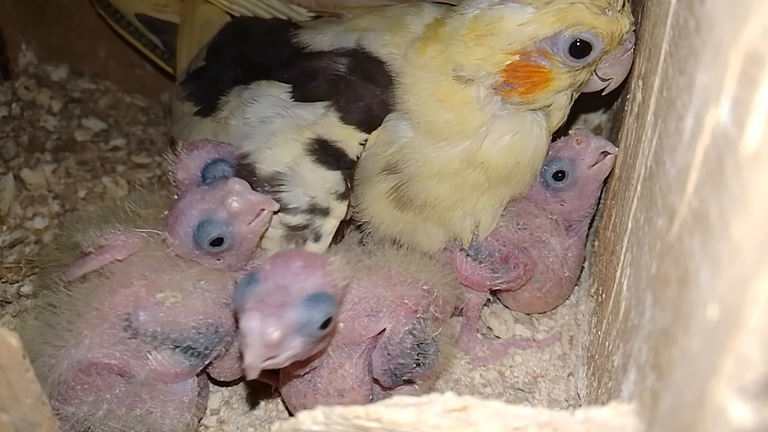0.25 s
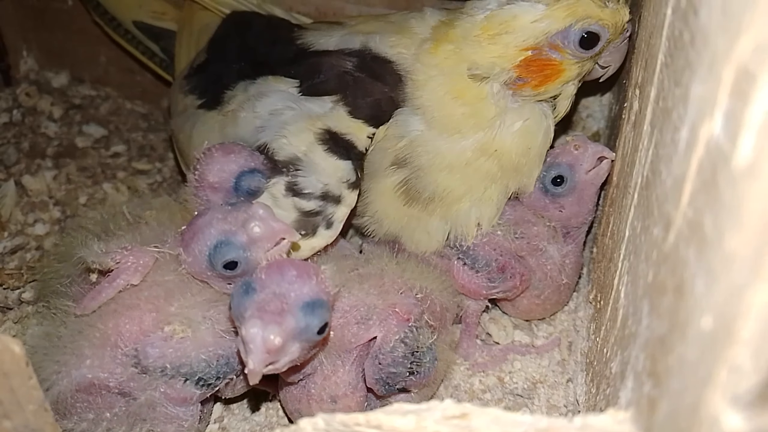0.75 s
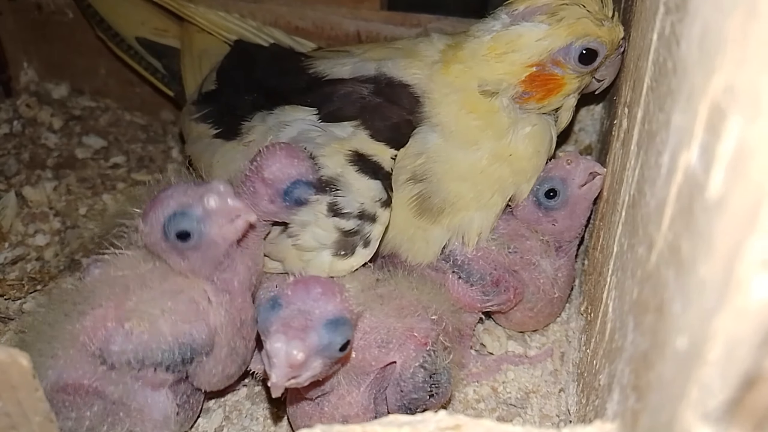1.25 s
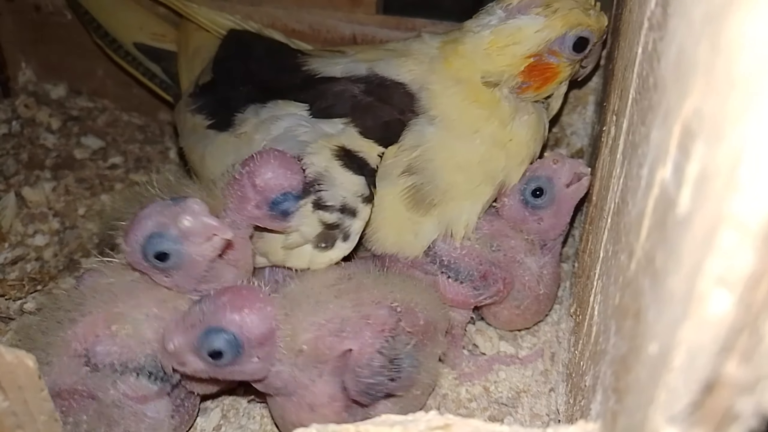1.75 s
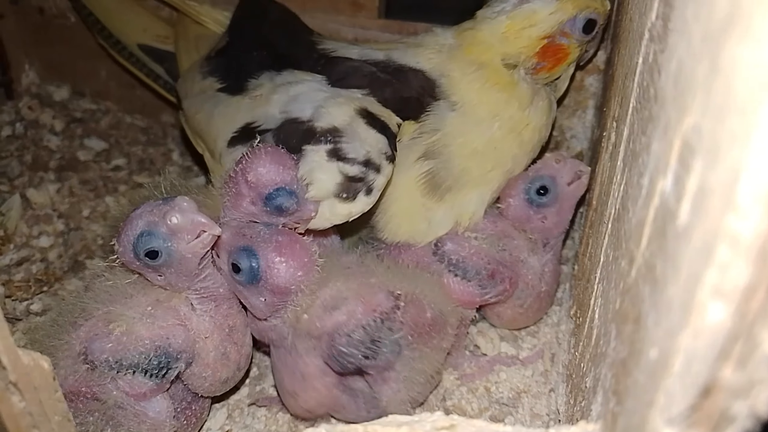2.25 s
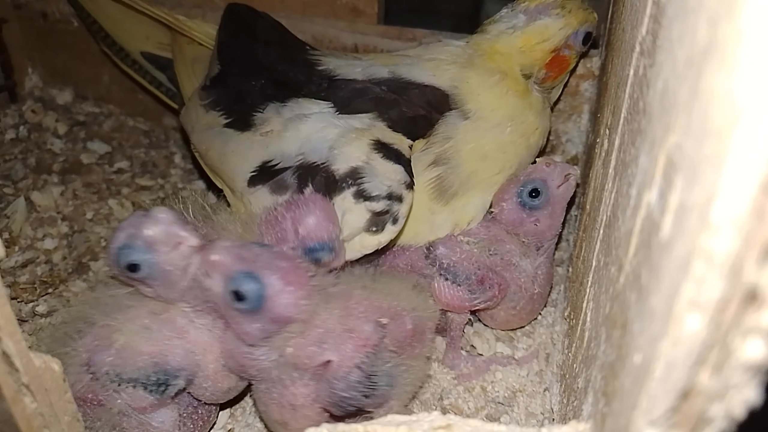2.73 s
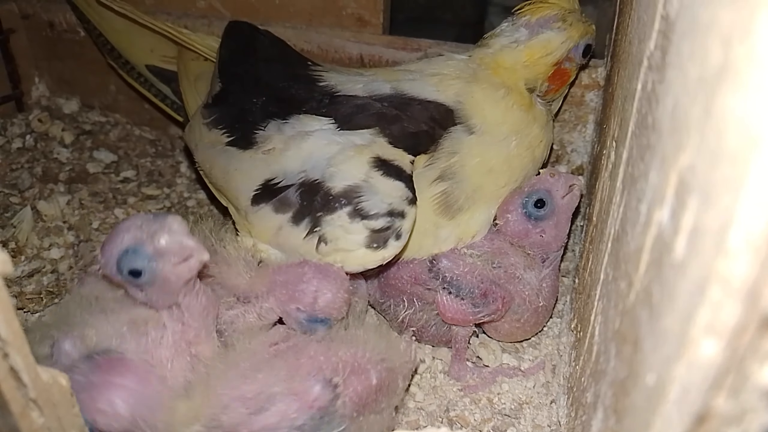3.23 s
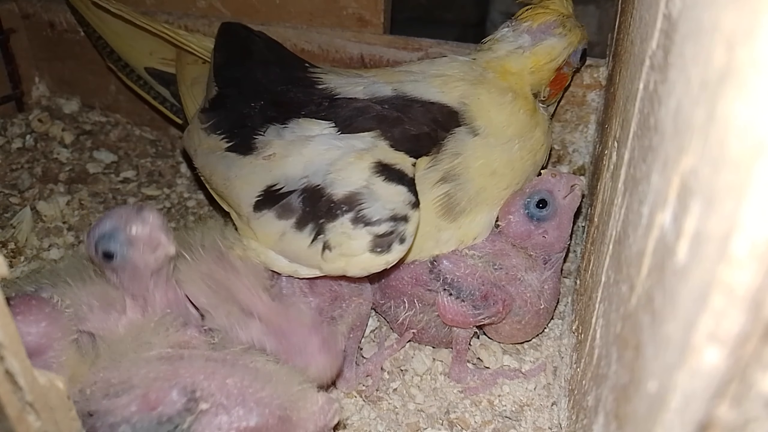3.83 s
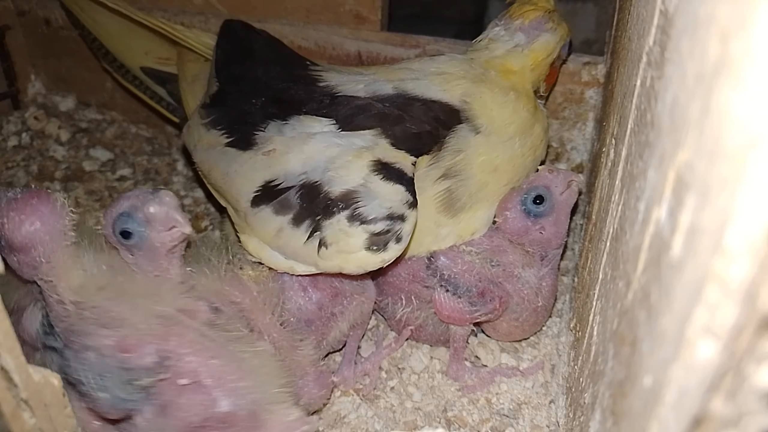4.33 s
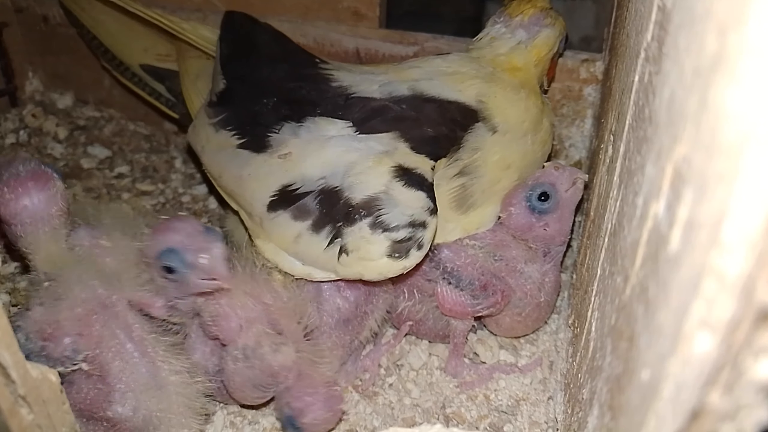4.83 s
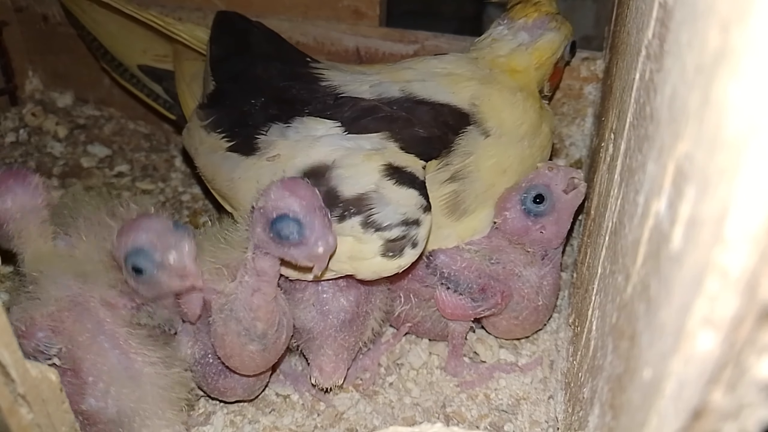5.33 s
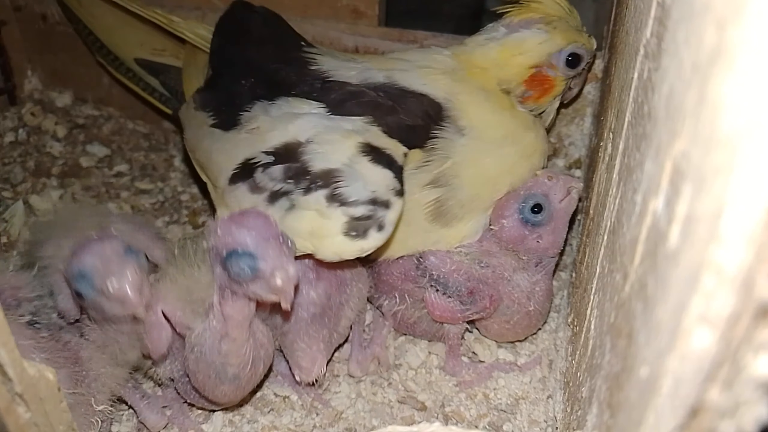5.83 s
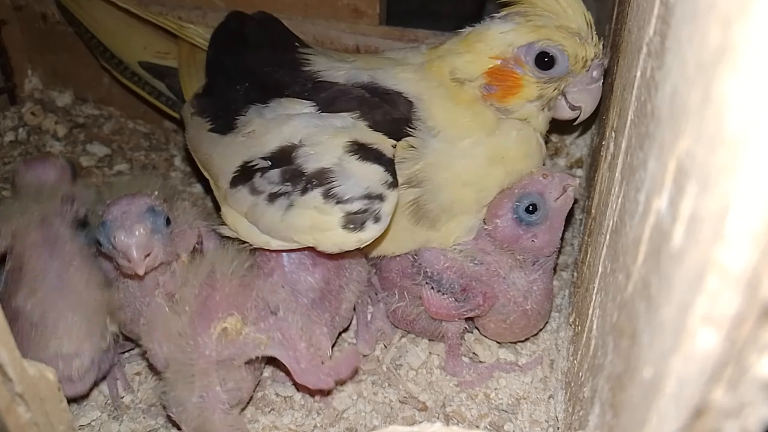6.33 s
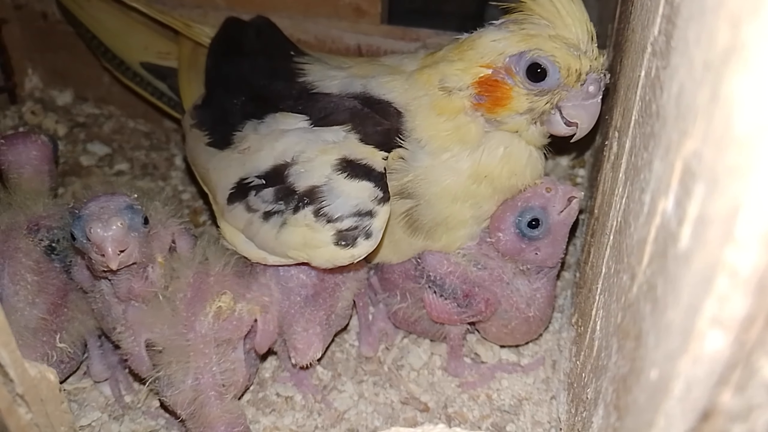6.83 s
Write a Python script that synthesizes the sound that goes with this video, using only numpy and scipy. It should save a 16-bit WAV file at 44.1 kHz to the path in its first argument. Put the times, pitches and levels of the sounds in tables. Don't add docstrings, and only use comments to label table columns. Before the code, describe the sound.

Several cockatiel chicks beg close to a small microphone inside a wooden nest box. Short hoarse rasps alternate with bending chirps, thin peeps and whistles, crowding into clusters and then thinning. Beaks tock hollowly on wood, claws click and feet scrape the litter. A sharp cry stands out near six seconds, then bumps and bright rasps close it. A faint low room hum lies beneath.

```python
import sys
import numpy as np
from scipy import signal
from scipy.fft import rfft, irfft
from scipy.io import wavfile
from scipy.ndimage import uniform_filter1d

SR = 44100
rng = np.random.default_rng(int(sys.argv[2]) if len(sys.argv) > 2 else 0)


def waveform_to_disk(signal):
    frames = np.transpose(np.atleast_2d(signal))
    scaled = np.clip(frames, -1, 1) * 32767
    samples = np.round(scaled).astype(np.int16)
    wavfile.write(sys.argv[1], SR, samples)


def makeup_ratio(level_db):
    decades = np.asarray(level_db, float) / 20
    return 10 ** decades


N = 311787
T = np.arange(N) / SR


def unit(x):
    return x / np.sqrt(np.mean(x ** 2) + 1e-30)


def noise(size=N):
    return rng.standard_normal(size)


def colour(x, points):
    hz, db = np.transpose(points)
    f = np.arange(len(x) // 2 + 1) * SR / len(x) + 1
    gain_db = np.interp(np.log(f), np.log(hz), db, -90, -90)
    return irfft(rfft(x) * makeup_ratio(gain_db), len(x))


def ring(x, hz, width_hz):
    return signal.lfilter(*signal.iirpeak(hz, hz / width_hz, fs=SR), x)


def walk(rate, size=N):
    hold = max(int(SR / rate), 1)
    steps = np.repeat(noise(size // hold + 1), hold)
    smooth = uniform_filter1d(uniform_filter1d(steps, hold), hold)
    return 1.73 * smooth[:size]


def add(out, s, x):
    i = int(s * SR)
    out[i:i + len(x)] += x[:len(out) - i]


def flaps(rate, scatter_db, puff_s, breath):
    snaps = (rng.random(N) < rate / SR) * makeup_ratio(scatter_db * noise())
    puffs = signal.lfilter([1], [1, -np.exp(-1 / (puff_s * SR))], snaps)
    return (unit(puffs) + breath) * noise()


# (frequency [Hz], level per Hz [dB])
VOICE_COLOUR = [(410, -59), (700, -33), (1030, -22), (1200, -17.5), (1800, -11.5), (2720, -3.5),
                (3400, -3.5), (3840, -4), (4540, -10.5), (5420, -25.5), (6540, -43), (8500, -61),
                (14400, -120)]


def far_chicks():
    voice = unit(colour(flaps(rate=300, scatter_db=5, puff_s=.004, breath=.8), VOICE_COLOUR))
    murmur = 0.11 * voice
    for hz in (2000, 2600, 3220, 4200):
        murmur = murmur + makeup_ratio(2.6 * walk(14)) * ring(voice, hz, hz / 4)
    return unit(murmur)


def shuffling():
    rustle = 0
    for hz in (260, 340, 450, 580, 780, 1000, 1250, 1550):
        band = unit(ring(ring(noise(), hz, hz / 3.5), hz, hz / 3))
        rustle = rustle + makeup_ratio(3.6 * walk(22)) * band
    return unit(rustle)


# (frequency [Hz], width [Hz], level [dB])
HUM = [(65.36, 4, 0), (93.5, 14.3, 0), (131.2, 23, -4.5)]


def hum():
    low = 0
    for hz, width_hz, db in HUM:
        low = low + makeup_ratio(db) * unit(ring(ring(noise(), hz, width_hz), hz, 3.4 * width_hz))
    return unit(low)


# (frequency [Hz], level per Hz [dB])
HOUSE_COLOUR = [(12, -43.5), (20, -11), (43, -13.5), (97, -8.5), (173, -13), (255, -5), (394, -22.5),
                (609, -38.5), (795, -17), (1770, -21.5), (2730, -22.5), (4130, -46.5), (6540, -69.5),
                (8500, -90), (14400, -120)]
# (frequency [Hz], level per Hz [dB])
AIR_COLOUR = [(4800, -8.5), (5800, -8), (6600, -20), (7500, -22), (8600, -20), (10500, -17.5), (12000, -29),
              (14000, -50), (15700, -49.5)]


def house():
    room = unit(colour(noise(), HOUSE_COLOUR))
    hiss = makeup_ratio(-26 + 3.5 * walk(33)) * unit(colour(noise(), AIR_COLOUR))
    return unit(room + hiss)


# (time [s], far chicks level [dB], shuffling level [dB], hum level [dB])
BUSTLE = [
    (0.0, -46.5, -48.5, -48),
    (1.06, -50.5, -55.5, -56.5),
    (1.28, -55.5, -52.5, -51.5),
    (1.54, -53.5, -50.5, -52),
    (2.73, -56, -60, -49.5),
    (3.25, -47, -56, -52),
    (3.68, -53.5, -61, -53.5),
    (6.56, -51.5, -59, -56.5),
    (7.07, -43, -47.5, -41),
]


def bustle():
    s, *columns = np.transpose(BUSTLE)
    far_db, shuffle_db, hum_db = (np.interp(T, s, c) for c in columns)
    murmur = makeup_ratio(np.minimum(far_db, -47) - 7) * far_chicks()
    return murmur + makeup_ratio(shuffle_db) * shuffling() + makeup_ratio(hum_db) * hum() + makeup_ratio(-55.5) * house()


# (time [s], length [s], frequency [Hz], level [dB])
SCUFFS = [(0.472, 0.2, 1490, -53), (0.651, 0.12, 1410, -46.5), (2.81, .11, 740, -46.5),
          (4.398, 0.077, 730, -51), (1.97, .1, 1500, -54), (3.55, .2, 1100, -55), (1.08, .07, 1100, -52),
          (6.18, .1, 1400, -52), (6.8, .25, 450, -56), (4.656, 0.34, 830, -52), (6.402, 0.12, 695, -51)]


def scuffs():
    out, grit = np.zeros(N), flaps(rate=200, scatter_db=5, puff_s=.003, breath=.7)
    for s, length, hz, db in SCUFFS:
        u = np.arange(int(length * SR)) / (length * SR)
        piece = grit[int(s * SR):][:len(u)]
        scrape = ring(ring(piece, hz, hz * 0.96), hz, hz * 0.95)
        add(out, s, makeup_ratio(db) * np.clip(u / 0.051, 0, 1) * (1 - u ** 3) * unit(scrape))
    return out


def band(x, order, low_hz, high_hz):
    return signal.sosfilt(signal.butter(order, (low_hz, high_hz), "band", fs=SR, output="sos"), x)


# (time [s], peak level [dB])
FLICKS = [
    (1.312, -63),
    (3.588, -60),
    (3.742, -68),
    (3.763, -64),
    (3.773, -63),
    (3.877, -66),
]


def flicks():
    out, t = np.zeros(N), np.arange(900) / SR
    for s, db in FLICKS:
        hiss = unit(band(noise(len(t)), 2, 5500, 11500))
        add(out, s, makeup_ratio(db) * np.clip(t / .001, 0, 1) * np.exp(-t / .005) * hiss)
    return out


# (time [s], peak level [dB])
TICKS = [(0.422, -27), (1.318, -41), (2.013, -48), (2.963, -26), (3.592, -38), (3.772, -51), (3.816, -36),
         (4.033, -27), (4.748, -27), (4.898, -33), (5.076, -30), (5.582, -37), (5.747, -42), (5.789, -30)]


def ticks():
    out, t = np.zeros(N), np.arange(400) / SR
    for s, db in TICKS:
        grain = noise(len(t))
        snap = unit(colour(grain, VOICE_COLOUR)) + makeup_ratio(-36) * band(grain, 4, 6000, 12500)
        add(out, s, makeup_ratio(db - 5) * np.clip(t / 0.00046, 0, 1) * np.exp(-t / 0.0032) * snap)
    return out


# (time [s], peak level [dB], frequency [Hz])
BUMPS = [(0.269, -42, 236), (1.053, -45, 248), (1.242, -42.5, 227), (1.318, -43.5, 251),
         (2.372, -41.5, 229), (6.177, -37.5, 303), (6.349, -41.5, 280), (6.416, -31.5, 263.4),
         (6.455, -38, 300), (6.585, -44, 300), (6.655, -42, 310), (6.751, -43.5, 274.4)]


def bumps():
    out, t = np.zeros(N), np.arange(int(.2 * SR)) / SR
    for s, db, hz in BUMPS:
        shape = np.clip(t / 0.0025, 0, 1) * np.exp(-t / 0.036)
        add(out, s, makeup_ratio(db + 0.5) * shape * np.sin(2 * np.pi * hz * t))
    return out


# (time [s], peak level [dB], upper ring level [dB])
TOCKS = [(0.591, -22.5, -4), (0.854, -46, 13.5), (1.221, -46, 10), (1.243, -24, -3), (1.909, -38, -16),
         (2.325, -27, -6.5), (2.568, -23.5, -1.5), (3.4, -22, -0.5), (3.933, -34.5, 4), (4.356, -46, 8),
         (4.39, -44, 6), (4.567, -31, 7.5), (5.265, -24.5, 0), (6.608, -23.5, -2.5), (6.855, -34, -6)]


def tocks():
    out, t = np.zeros(N), np.arange(int(.2 * SR)) / SR
    blow = np.exp(-((t - .002) / 0.0013) ** 2)
    after = np.clip(t / .009 - .4, 0, 1) * np.exp(-t / .008)
    panel = np.sin(2 * np.pi * 985 * t) * (.65 * blow + .3 * after)
    upper = 0.71 * blow * np.sin(2 * np.pi * 1350 * t)
    for s, db, upper_db in TOCKS:
        add(out, s, makeup_ratio(db) * (panel - makeup_ratio(upper_db) * upper))
    return out


def glide(row, settle=2, peak=.35, start_db=-1, end_db=-9.5):
    s, length, from_hz, to_hz, db = row
    u = np.linspace(0, 1, num=17)
    done = (1 - np.exp(-settle * u)) / (1 - np.exp(-settle))
    hz = from_hz + (to_hz - from_hz) * done
    swell_db = np.interp(u, [0, np.clip(peak, .05, .95), 1], [start_db, 0, end_db])
    return np.transpose([s + length * u, hz, db + swell_db])


def tone(out, table, series, rough, wobble, fuzz, edge_s=.004, throb=.25):
    s, hz, *levels = np.transpose(table)
    t = s[0] + np.arange(int((s[-1] - s[0] + edge_s) * SR)) / SR
    trembling_hz = np.interp(t, s, hz) * (1 + wobble * walk(300, size=len(t)))
    phase = 2 * np.pi * np.cumsum(trembling_hz) / SR
    edge = np.clip(np.minimum(t - t[0], t[-1] - t) / edge_s, 0, 1)
    levels = [np.interp(t, s, level) for level in levels]
    if series is None:
        partials = enumerate(levels, start=1)
    else:
        partials = [(k, levels[0] + db) for k, db in series]
    sound = 0
    for k, db in partials:
        flutter = 1 + rough * walk(205, size=len(t)) + fuzz * walk(1100, size=len(t))
        sound = sound + makeup_ratio(db) * flutter * np.sin(k * phase)
    pulse = 1 + throb * np.sin(2 * np.pi * 98 * t)
    add(out, s[0], np.sqrt(2) * edge * pulse * sound)


PURE = [(1, 0)]


# (time [s], length [s], from [Hz], to [Hz], peak level [dB])
HIGH_STRANDS = [
    (6.108, .03, 5800, 5700, -59),
    (6.192, .022, 4300, 5800, -51),
    (3.155, .035, 5100, 5500, -58),
    (6.96, .05, 6400, 6700, -58),
    (6.59, .04, 6200, 5700, -52),
]


def high_strands():
    out = np.zeros(N)
    for row in HIGH_STRANDS:
        tone(out, glide(row), PURE, rough=.4, wobble=.012, fuzz=.4)
    return out


# (time [s], length [s], from [Hz], to [Hz], peak level [dB])
STRANDS = [(.947, .03, 5250, 4950, -54), (.95, .035, 4250, 3850, -46), (2.52, .055, 2950, 2450, -41),
           (3.16, .04, 1750, 1900, -44), (3.162, .03, 3500, 3600, -43), (3.145, .045, 2900, 2740, -44),
           (3.94, .015, 3450, 3350, -43), (3.95, .03, 4150, 3900, -52), (3.965, .025, 3000, 2000, -49),
           (3.978, .022, 2000, 1900, -52), (4.0, .024, 4200, 4050, -45), (4.008, .02, 2050, 1950, -50),
           (4.027, .025, 2750, 2700, -41), (4.07, .02, 4300, 3700, -41), (6.012, .035, 4900, 3200, -49),
           (6.075, .03, 1700, 1900, -48), (6.082, .02, 2800, 2700, -43), (6.1, .018, 4100, 4300, -46),
           (6.11, .04, 2950, 2800, -42), (6.15, .022, 4300, 4100, -42), (6.175, .03, 3850, 4180, -36),
           (6.23, .015, 1600, 1550, -48), (6.6, .022, 2700, 2650, -41), (6.905, .03, 2500, 2150, -44),
           (6.968, .032, 3300, 3450, -36)]


def strands():
    out = np.zeros(N)
    for row in STRANDS:
        tone(out, glide(row), PURE, rough=.35, wobble=.015, fuzz=.35, edge_s=.003)
    return out


# (time [s], pitch [Hz], level [dB])
WHINE = [
    (5.09, 508, -68),
    (5.201, 531.4, -62.5),
    (5.33, 522.6, -71),
]
# (multiple, level [dB])
WHINE_PARTIALS = [(4, -6), (5, 6), (6, 6), (7, 5.5), (8, 3), (9, -7)]


def whine():
    out = np.zeros(N)
    tone(out, WHINE, WHINE_PARTIALS, rough=0.45, wobble=0.0011, fuzz=0.083, edge_s=0.012)
    return out


# (time [s], length [s], from [Hz], to [Hz], peak level [dB])
PEEPS = [
    (1.085, .045, 1040, 1080, -52),
    (3.15, 0.062, 1600, 1880, -47),
    (1.25, 0.089, 1212, 1184, -54.5),
    (3.12, .09, 1500, 1370, -46),
    (5.408, 0.048, 1040, 1054, -53),
    (5.47, 0.075, 1100, 1330, -49.5),
    (5.64, 0.1, 1200, 1520, -53),
    (5.585, .05, 1350, 1200, -53),
    (4.8, .05, 1424, 1385, -59),
]
# (multiple, level [dB])
PEEP_PARTIALS = [(1, 2), (2, -1), (3, -10), (4, -24), (5, -30)]
# (time [s], length [s], from [Hz], to [Hz], peak level [dB])
NASAL_PEEPS = [
    (2.05, 0.066, 1140, 1094, -50),
    (3.25, 0.13, 1324, 1173, -52),
    (3.34, 0.084, 1106, 1053, -48),
    (3.262, 0.083, 1240, 1190, -46),
]
# (multiple, level [dB])
NASAL_PARTIALS = [(1, -5.5), (2, 0.5), (3, -11), (4, -26.5), (5, -25)]
# (time [s], length [s], from [Hz], to [Hz], peak level [dB])
SQUEAKS = [
    (.948, .045, 1060, 900, -49),
    (3.008, 0.034, 1392, 1420, -48),
    (3.05, .045, 1212, 1208, -52),
    (3.095, .045, 1200, 1480, -52),
    (3.498, .045, 1530, 1330, -49),
]
# (multiple, level [dB])
SQUEAK_PARTIALS = [(1, 0), (2, 0), (3, -1), (4, -11), (5, -22)]


def peeps():
    out, air = np.zeros(N), dict(rough=.38, wobble=.012, fuzz=.32)
    for row in PEEPS:
        tone(out, glide(row, settle=1.17, peak=.55, start_db=-3, end_db=-7), PEEP_PARTIALS, **air)
    for row in NASAL_PEEPS:
        tone(out, glide(row), NASAL_PARTIALS, **air)
    for row in SQUEAKS:
        tone(out, glide(row), SQUEAK_PARTIALS, **air)
    return out


# (time [s], length [s], from [Hz], to [Hz], peak level [dB])
LANDINGS = [
    (1.398, .043, 4400, 2820, -33),
    (1.755, .042, 3100, 2790, -30),
    (1.74, .018, 3600, 3200, -40),
    (5.886, .065, 2180, 2120, -34.5),
    (6.254, .047, 2750, 2600, -43),
    (2.776, .03, 2750, 2680, -47),
]


def landings():
    out = np.zeros(N)
    for row in LANDINGS:
        note = glide(row, settle=5, peak=.55, start_db=-2, end_db=-7)
        tone(out, note, PURE, rough=.38, wobble=.012, fuzz=.32)
    return out


# (time [s], pitch [Hz], level [dB])
ARCH = [
    (2.142, 2750, -42),
    (2.158, 3400, -37),
    (2.176, 3900, -35),
    (2.194, 3524, -36),
    (2.21, 2921, -42),
    (2.225, 2750, -42),
    (2.24, 2500, -50),
]
SLIDE = [
    (2.461, 4000, -42),
    (2.471, 3500, -40),
    (2.48, 3050, -45),
    (2.491, 2251, -45),
    (2.505, 1896, -52),
]
WARBLE = [
    (4.398, 3900, -42),
    (4.406, 3292, -36),
    (4.412, 2927, -33),
    (4.43, 2926, -35),
    (4.44, 2920, -36),
    (4.455, 2930, -27),
    (4.468, 2726, -35),
    (4.486, 2921, -41),
    (4.508, 2770, -35),
    (4.52, 2600, -48),
]
VEE = [
    (4.178, 4100, -44),
    (4.188, 2800, -44),
    (4.2, 2150, -45),
    (4.215, 2200, -45),
    (4.223, 3500, -41),
    (4.235, 3100, -41),
    (4.255, 2500, -50),
]


def bends():
    out = np.zeros(N)
    for bend in (ARCH, SLIDE, WARBLE, VEE):
        tone(out, bend, PURE, rough=.4, wobble=.014, fuzz=.38)
    return out


# (time [s], length [s], from [Hz], to [Hz], peak level [dB])
DIVES = [(0, .065, 2450, 1300, -46), (0, .04, 4250, 3500, -50), (2.2, .04, 1350, 1150, -52),
         (2.243, .035, 2050, 1800, -51), (2.145, .02, 2250, 2100, -48), (4.42, .018, 3500, 3400, -42),
         (4.453, .022, 3500, 3300, -39), (5.855, .03, 3000, 2850, -36), (6.82, .025, 2700, 2550, -42),
         (1.475, .06, 2500, 1700, -45), (1.79, .05, 2450, 1700, -42), (1.43, .03, 2500, 1800, -44),
         (1.455, .035, 2950, 2750, -47), (1.697, 0.035, 3800, 3200, -42), (1.712, .03, 2900, 1900, -45),
         (1.88, .04, 2600, 2370, -53.5), (2.12, .05, 1337, 1146, -51), (2.508, 0.055, 3200, 2500, -43),
         (5.945, .03, 2150, 1500, -45), (2.658, .015, 4100, 3300, -53), (2.91, .035, 1400, 1150, -53),
         (4.935, .025, 2700, 1900, -55), (4.26, 0.03, 1720, 1600, -54), (4.285, .045, 1550, 1250, -53),
         (4.5, .055, 2800, 1650, -40), (4.749, 0.045, 1840, 1906, -46), (6.02, .03, 4600, 3240, -53),
         (6.557, 0.047, 3300, 2200, -40), (6.811, .015, 3850, 3400, -34), (6.9, 0.048, 2440, 2000, -51)]
# (time [s], length [s], from [Hz], to [Hz], peak level [dB])
SWELLS = [(.888, 0.034, 3150, 3400, -36), (1.735, 0.022, 2000, 2100, -46), (4.476, 0.022, 3650, 3520, -29),
          (1.02, .06, 3200, 3600, -35), (2.225, .018, 1600, 1800, -48), (4.495, .025, 4000, 4300, -45),
          (4.465, .02, 4000, 4300, -46), (6.68, .04, 3500, 3950, -32), (6.86, .05, 3550, 3650, -35),
          (5.86, .028, 1700, 1780, -32), (6.195, .042, 2800, 3050, -39), (6.605, 0.057, 2620, 2360, -47.5),
          (6.965, 0.035, 3350, 3500, -39)]
# (time [s], length [s], from [Hz], to [Hz], peak level [dB])
CLIMBS = [
    (1.09, .03, 3600, 3900, -38),
    (6.652, .03, 3250, 3500, -33),
    (6.062, 0.025, 3500, 4300, -43),
    (6.095, 0.025, 1900, 2300, -47),
    (6.132, .022, 3400, 3600, -42),
    (6.165, 0.06, 1800, 2100, -51),
    (6.232, 0.018, 2950, 4400, -38),
    (6.247, .06, 4800, 5250, -52),
]


def chirps():
    notes = [glide(row, settle=1.72, peak=.4, start_db=-1.5, end_db=-11.5) for row in DIVES]
    notes += [glide(row, settle=2, peak=.97, start_db=-7.5, end_db=-14.5) for row in SWELLS]
    notes += [glide(row, settle=1.6, peak=.26, start_db=-7.5, end_db=-5) for row in CLIMBS]
    out = np.zeros(N)
    for note in notes:
        tone(out, note, [(1, 0), (2, -36)], rough=.45, wobble=.02, fuzz=.4)
    return out


def soften(x):
    return signal.sosfilt(signal.butter(7, 5200, fs=SR, output="sos"), x)


# (time [s], pitch [Hz], first partial level [dB], second [dB], third [dB])
RISING_CALL = [
    (.112, 1344, -49, -66, -60),
    (.158, 1620, -43, -55, -50),
    (.182, 1800, -42, -50, -66),
    (.2, 1935, -39, -38, -78),
    (.232, 2040, -41, -43, -76),
    (.28, 2010, -45, -50, -80),
    (.3, 1880, -50, -54, -84),
    (.344, 1962, -40.5, -45, -76),
    (.372, 1960, -52, -56, -90),
]
# (multiple, level under the first partial [dB])
OVERTONES = [(4, -42), (5, -41), (6, -46)]


def rising_call():
    body, bright = np.zeros(N), np.zeros(N)
    tone(body, RISING_CALL, None, rough=.25, wobble=.014, fuzz=.45, edge_s=.008, throb=.55)
    tone(bright, RISING_CALL[:5], OVERTONES, rough=.6, wobble=.014, fuzz=.5, edge_s=.008)
    return soften(body) + bright


# (time [s], length [s], from [Hz], to [Hz], peak level [dB])
SHRIEK = (5.824, .043, 1780, 1710, -21.5)
# (multiple, level [dB])
SHRIEK_PARTIALS = [(1, -14), (2, 0), (3, -23)]
# (multiple, level [dB])
SHRIEK_EDGE = [(3, -30), (4, -46), (5, -47), (6, -54), (7, -62)]


def shriek():
    body, sharp = np.zeros(N), np.zeros(N)
    tone(body, glide(SHRIEK), SHRIEK_PARTIALS, rough=.38, wobble=.012, fuzz=.32)
    tone(sharp, glide(SHRIEK), SHRIEK_EDGE, rough=.4, wobble=.01, fuzz=.4)
    return soften(body) + sharp


def whistles():
    mellow = soften(chirps() + landings() + peeps() + whine() + bends() + strands())
    calls = mellow + rising_call() + shriek() + high_strands()
    hiss = noise()
    air = makeup_ratio(-20.5) * unit(colour(hiss, VOICE_COLOUR)) + makeup_ratio(-45) * unit(colour(hiss, AIR_COLOUR))
    return calls + uniform_filter1d(np.abs(calls), size=200) * air


def patches(x, bands):
    return sum(makeup_ratio(3 * walk(45)) * ring(ring(x, hz, hz / 7), hz, hz / 5) for hz in bands)


# (time [s], peak level [dB], throat [Hz], brightness [dB], length [s])
SHORT_RASPS = [(0.4215, -28, 2900, -30, 0.024), (4.376, -33, 3600, -35, .018),
               (0.5445, -40, 2320, -19, 0.025), (1.9764, -41, 3320, -29, 0.028),
               (2.14, -28, 4200, -40, 0.0085), (1.54, -15, 3600, -20, .008), (6.169, -23, 3700, -40, .003),
               (2.85, -40, 2000, -30, .02), (2.679, -33, 4600, -18, 0.022), (2.961, -29, 3600, -23, 0.011),
               (3.4963, -42, 3070, -10, 0.048), (3.755, -41.5, 3270, 2, 0.012),
               (3.8157, -25, 4620, -22, 0.0098), (3.928, -36, 3540, -31, 0.028),
               (3.9683, -38, 5000, -10, 0.047), (4.748, -38, 3350, -31, 0.0099),
               (4.896, -28.5, 3600, -52, 0.015), (5.0717, -32.5, 3280, -13.5, 0.017),
               (5.5805, -22.5, 3540, -64, 0.017), (5.7859, -23, 3820, -11, 0.02)]
# (time [s], peak level [dB], throat [Hz], brightness [dB], length [s])
OPEN_RASPS = [(1.534, -17, 3350, -19, 0.055), (2.3195, -20, 3500, -5, 0.047),
              (2.8133, -39, 2650, -19, 0.054), (2.989, -24.5, 3600, -20, 0.029),
              (3.652, -21, 4310, -15, 0.032), (4.0304, -23, 4320, -5, 0.03), (4.068, -24, 3800, -12, 0.042),
              (5.2405, -29.5, 4060, -14, 0.018), (5.4294, -34, 4100, -30, 0.023),
              (5.934, -37, 3690, -34, 0.016), (6.381, -33, 3000, -18, 0.024),
              (6.4869, -30.5, 3230, -7, 0.033), (6.5864, -26.5, 2560, -8, 0.044)]
# (time [s], peak level [dB], throat [Hz], length [s])
DULL_RASPS = [(.2944, -28, 3770, 0.059), (0.652, -36, 3300, 0.089), (0.8075, -35, 2000, 0.058),
              (0.952, -30.5, 4050, 0.12), (1.1163, -28.5, 2850, 0.024), (1.3613, -28, 2430, 0.079),
              (1.606, -31, 3470, 0.052), (2.021, -30.5, 2660, 0.039), (3.232, -25, 3610, .03),
              (3.275, -33, 3700, .06), (3.34, -36, 3400, .07), (2.16, -34, 3700, .06),
              (4.25, -37.5, 3200, 0.05), (4.4692, -34, 3630, 0.052), (4.6646, -31, 3530, 0.018),
              (5.829, -21.5, 3220, .055)]
# (time [s], peak level [dB], throat [Hz], brightness [dB], length [s])
LONG_RASPS = [
    (0.01, -40.5, 3730, -21, 0.07),
    (0.14, -36.5, 4200, -12, .14),
    (0.8555, -28, 3150, -34, 0.074),
    (1.0355, -21, 3380, -56, 0.1),
    (6.0716, -27.5, 4220, -20, 0.14),
    (6.641, -17, 3500, -9, 0.085),
    (6.84, -23, 3630, -7, 0.07),
    (6.94, -30, 3580, -12, 0.14),
]


def rasps():
    out, voice = np.zeros(N), flaps(rate=350, scatter_db=4, puff_s=.002, breath=.6)
    calm = unit(colour(flaps(rate=350, scatter_db=3, puff_s=.004, breath=2), AIR_COLOUR))
    body, top = unit(colour(voice, VOICE_COLOUR)), unit(colour(voice, AIR_COLOUR))
    top = 1.5 * patches(top, (4300, 4950, 5700, 6400))
    sheen = 1.2 * patches(calm, (7500, 8600, 9800, 11000, 12200))
    dull = [(s, db, hz, -38.5, length) for s, db, hz, length in DULL_RASPS]
    # (bursts, opening as a share of length, fall [s], longest [s])
    kinds = ((SHORT_RASPS, .07, .012, .03), (OPEN_RASPS + dull, .33, .017, .07), (LONG_RASPS, .5, .019, .14))
    for table, rise, fall_s, most_s in kinds:
        t = np.arange(int((most_s + .15) * SR)) / SR
        for s, db, hz, bright_db, length in table:
            length = min(length, most_s)
            opening = np.clip(t / (rise * length), 0, 1)
            shape = opening * np.exp(-.6 * t / length - np.clip(t - length, 0, 1) / fall_s)
            i = min(int(s * SR), N - len(t))
            now = slice(i, i + len(t))
            throat = 0.33 * body[now] + 2.05 * ring(body[now], hz, width_hz=417)
            throat = throat + 0.77 * ring(body[now], 0.802 * hz, width_hz=128)
            throat = throat + ring(body[now], 1.164 * hz, width_hz=360)
            warped = np.cumsum(1 + .025 * walk(30, size=len(t)))
            throat = np.interp(warped, np.arange(len(t)), throat)
            hiss = makeup_ratio(bright_db) * top[now] + makeup_ratio(0.52 * bright_db - 15.5) * sheen[now]
            add(out, s - min(.4 * rise * length, .006), makeup_ratio(db - 12) * shape * (throat + hiss))
    return out


def box(x, wet_db=-7):
    t, t60_s = np.arange(int(.25 * SR)) / SR, 0.081
    tail = ring(noise(len(t)), 1790, width_hz=2700)
    tail = tail * np.exp(-np.log(1000) * t / t60_s) * (t > .002)
    return x + makeup_ratio(wet_db) * signal.fftconvolve(x, tail / np.sqrt(np.sum(tail ** 2)))[:N]


def scene():
    voices = box(rasps() + whistles())
    wood = box(tocks() + bumps() + ticks(), wet_db=-11.5)
    return (voices + wood + bustle() + scuffs() + flicks())[None]


def roll_off(x):
    return signal.sosfilt(signal.butter(12, 15720, fs=SR, output="sos"), x)


def record(dry):
    mix = dry - .0028
    return roll_off(mix)


dry = scene()
out = record(dry)
waveform_to_disk(out)
```